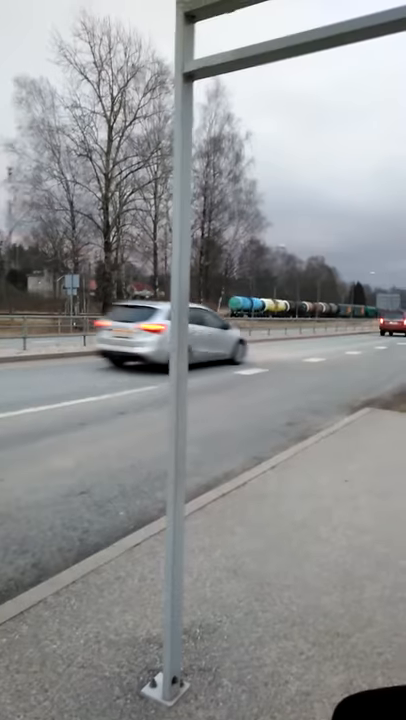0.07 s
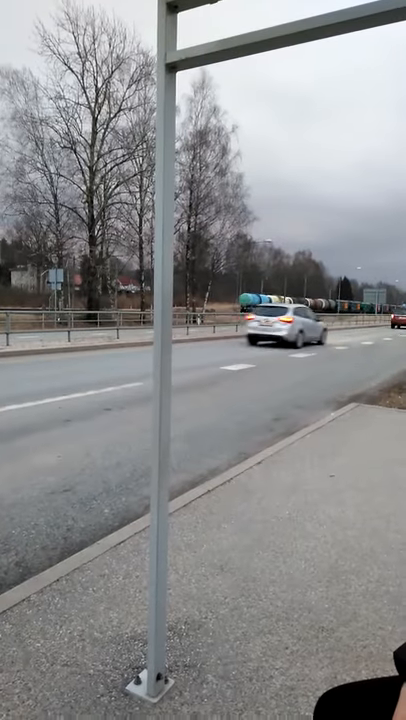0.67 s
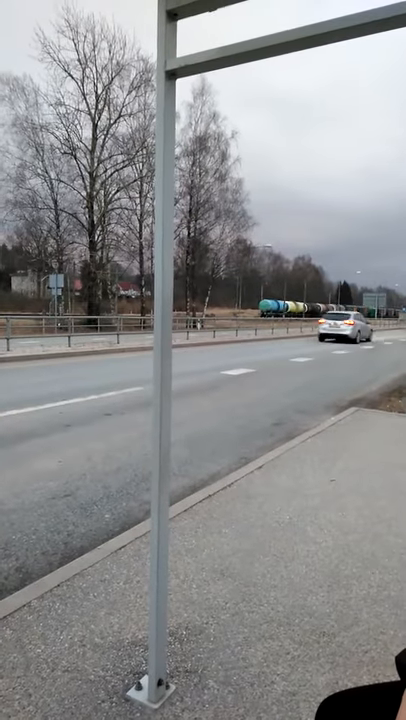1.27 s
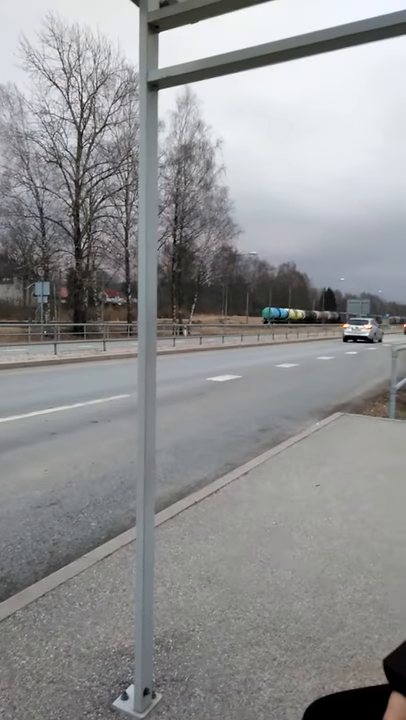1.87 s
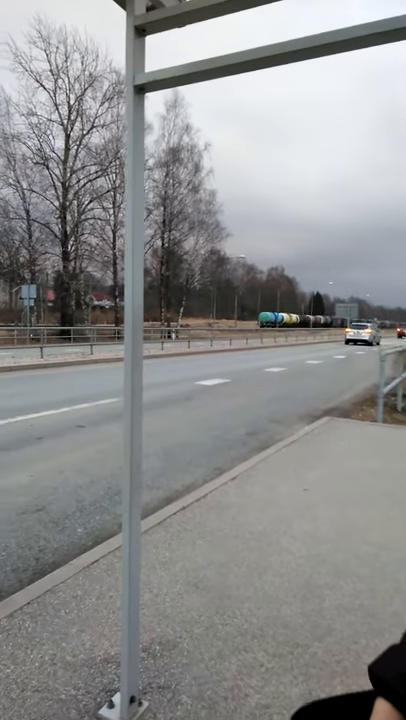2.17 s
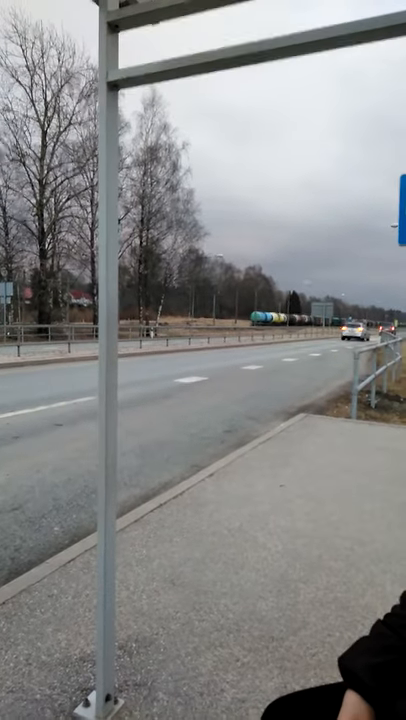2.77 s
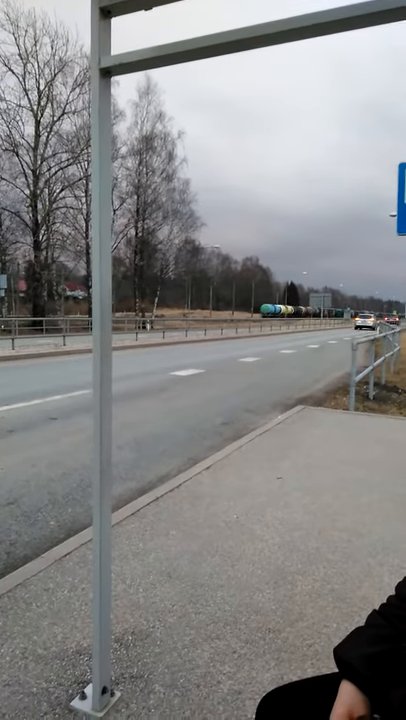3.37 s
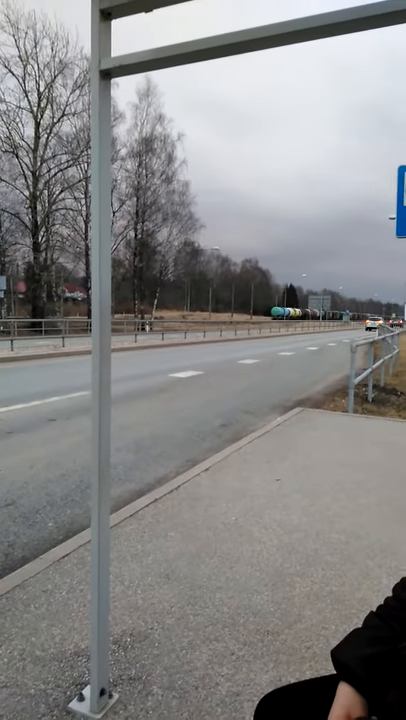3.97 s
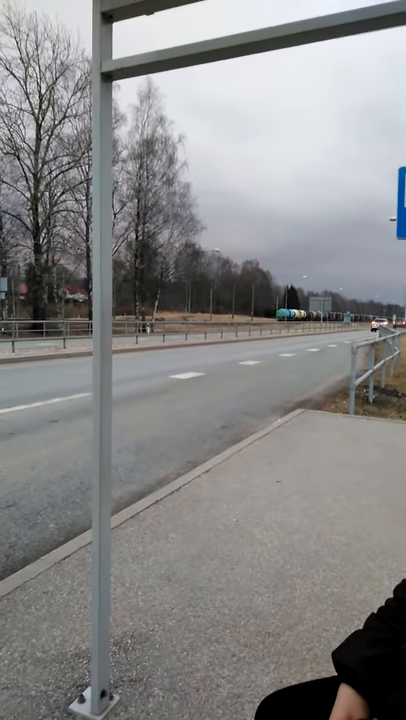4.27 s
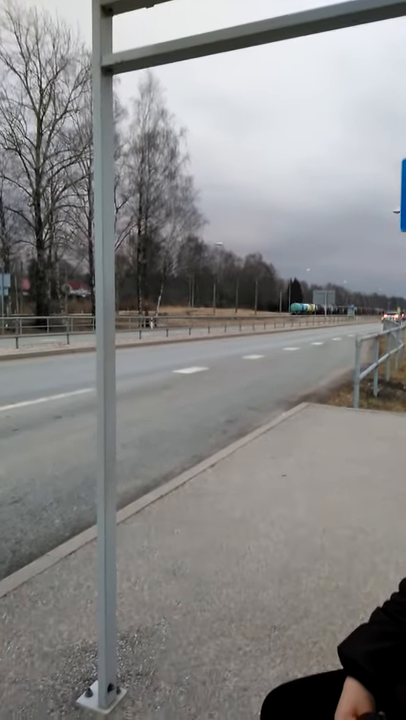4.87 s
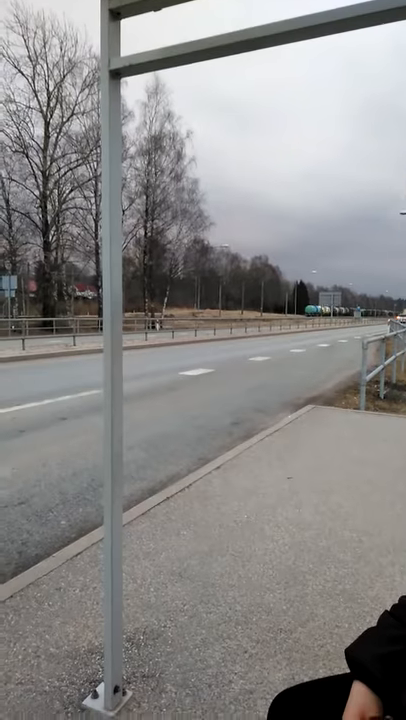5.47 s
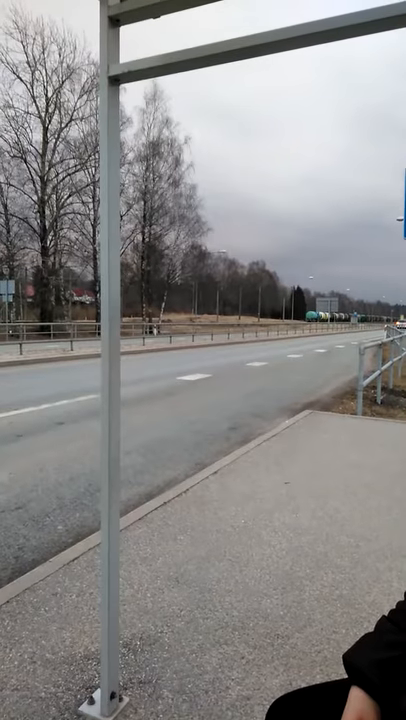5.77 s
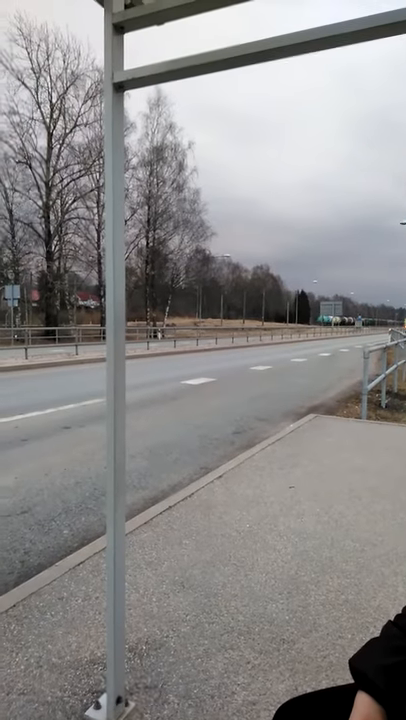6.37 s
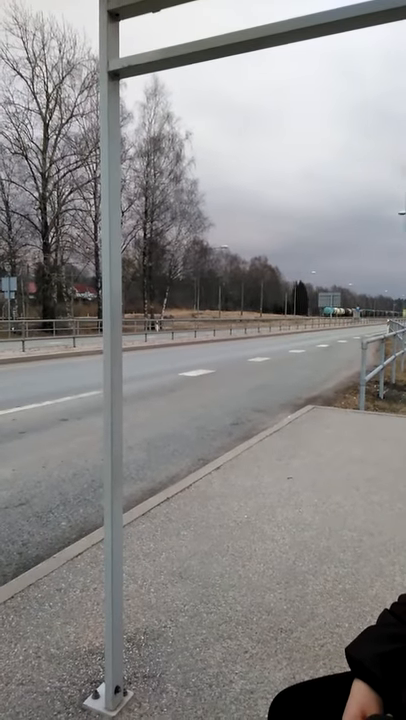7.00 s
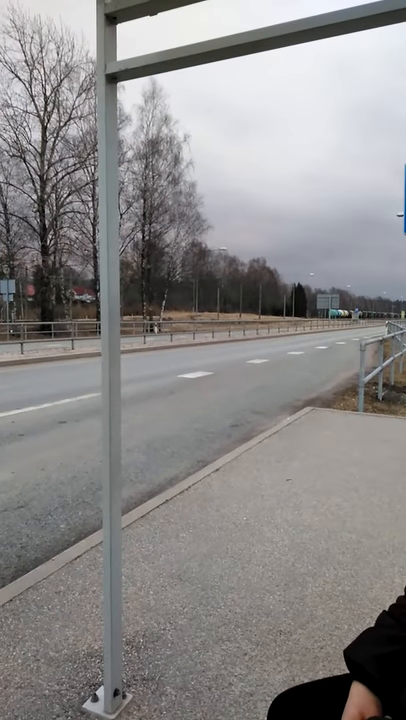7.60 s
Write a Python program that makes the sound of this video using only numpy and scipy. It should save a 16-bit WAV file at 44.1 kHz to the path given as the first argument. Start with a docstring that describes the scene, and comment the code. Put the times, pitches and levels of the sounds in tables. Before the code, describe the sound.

A distant freight train rolls along with a low rumble and a quick, even clacking, dotted with dull knocks, short steel rings and thin wheel squeals. At the start a car is pulling away down the road, its tyre noise dying down over the first few seconds. The train carries on, gradually softer, while small gusts of wind bump against the microphone in the open air.

```python
"""Tyre roar fades and a rumbling freight train clacks about six times a second, far across a field.
The roar is a car driving away from a roadside bus stop. The clack is a worn wheel hitting the rail
once a turn, smeared by distance; wagons knock and boom, wheels squeal and the rails sing.
Light wind buffets a hand-held phone and a sleeve brushes it once.
The phone's two microphone openings (its ports) colour everything."""
import sys
import numpy as np
from scipy import signal
from scipy.fft import rfft, irfft, next_fast_len
from scipy.io import wavfile
from scipy.ndimage import uniform_filter1d, map_coordinates

SR = 44100
rng = np.random.default_rng(int(sys.argv[2]) if len(sys.argv) > 2 else 0)


def output_pcm(signal):
    """Save a mono or channel-first signal as 16-bit PCM at the path in sys.argv[1].

    Samples are clipped to [-1, 1] before scaling.
    """
    pcm = np.clip(np.atleast_2d(signal).T, -1, 1) * 32767
    wavfile.write(sys.argv[1], SR, np.round(pcm).astype(np.int16))


N = 341334
TIME = np.arange(N) / SR
FREQ = np.maximum(np.arange(N // 2 + 1) * SR / N, 1)

# loudness of the wagons' rumble (time [s], level [dB])
RUMBLE_LEVELS = [(0, -32), (.6, -33), (.9, -34.5), (1.5, -35), (3, -36.5), (4, -37.5), (5, -40), (6, -39),
                 (7.7, -38.5)]
# tone of a thudding bogie, the wheeled frame under a wagon (frequency [Hz], relative level [dB])
THUD_SPECTRUM = [(130, -19), (250, 2.5), (500, -1.5), (900, 2), (1300, -11.5), (2500, -57)]
# tone of struck steel (frequency [Hz], relative level [dB])
STEEL_SPECTRUM = [(600, -35), (1100, -2.5), (1600, 1), (2300, 2), (3200, 1.5), (4300, -6.5), (5500, -30),
                  (11000, -55)]
# tone of a hissing wheel rim (frequency [Hz], relative level [dB])
HISS_SPECTRUM = [(3000, -21), (4900, 1.5), (6300, 3.5), (7600, -3), (8300, -16), (11000, -37), (15000, -55)]


def car(top_hz=10050, top_db=-3.5, dulling_db_per_s=17):
    """Tyres roar on asphalt; the roar fades as the car leaves, and its highest hiss dies away quickly."""
    # tone of the tyres (frequency [Hz], relative level [dB])
    tyre_spectrum = [(100, -0.5), (300, -2), (780, -3), (1050, 3), (1350, -6.5), (1650, -3), (2000, -10.5),
                     (3300, -18), (4500, -26), (6500, -23), (8500, -24.5), (11000, -26), (13000, -46),
                     (15000, -66)]
    # loudness of the car (time [s], level [dB])
    car_levels = [(0, -38.5), (.5, -41), (1, -42.5), (1.5, -46.5), (2.3, -48), (3.5, -57), (5, -54),
                  (7.7, -62)]
    roar = turbulence(outdoor_noise(tyre_spectrum), depth_db=1.43, rate=16)
    top = irfft(rfft(roar) / (1 + (top_hz / FREQ) ** 10), N)
    top_gain = undb(top_db - dulling_db_per_s * TIME)
    return (roar + top * (top_gain - 1)) * undb(over_time(car_levels))


def train(treble_hz=3500):
    """Wheels roar on the rails and grow duller with distance; the wagons rumble unevenly underneath."""
    # tone of the rolling wheels (frequency [Hz], relative level [dB])
    roll_spectrum = [(150, 5), (400, -2.5), (850, 2.5), (1300, -5), (2500, -2.5), (3300, -7.5), (4400, -13),
                     (6500, -15), (7700, -22), (8400, -35), (11000, -43), (15000, -81)]
    # loudness of the rolling (time [s], level [dB])
    roll_levels = [(0, -46.5), (2.4, -47), (3.3, -45), (4.3, -47.5), (5.3, -48.2), (6, -49), (7.7, -50.5)]
    # treble, sinking with distance (time [s], gain [dB])
    treble_gains = [(0, 7.5), (3.5, 2), (5.3, 2), (6, -2), (7.7, -2)]
    # tone of the rumble (frequency [Hz], relative level [dB])
    rumble_spectrum = [(20, -42), (35, -33), (60, -0.5), (90, 0), (130, -2.5), (180, -6.5), (240, -15),
                       (310, -36.5), (600, -61)]
    roll = turbulence(outdoor_noise(roll_spectrum), depth_db=1.28, rate=14)
    treble = irfft(rfft(roll) / (1 + (treble_hz / FREQ) ** 4), N)
    roll = roll + treble * (undb(over_time(treble_gains)) - 1)
    rumble = outdoor_noise(rumble_spectrum) * undb(over_time(RUMBLE_LEVELS) + 1.34 * wobble(25))
    return roll * undb(over_time(roll_levels)) + rumble


def clacks(first_s=.079, turn_s=.1685, jitter_s=.004, thud_lead_s=.011, scatter_db=1.8, hiss_db=-8):
    """A worn wheel hits the rail once a turn: the bogie thuds, the steel rings and hisses."""
    # strength of the clacks (time [s], thud level [dB], ring level [dB])
    clack_levels = [(0, -52, -52), (1, -49, -52.5), (1.85, -41.5, -47.5), (2.9, -48.5, -51),
                    (3.55, -54, -64), (4.2, -50, -52.5), (5.2, -53, -51.5), (6.4, -52.5, -52.5),
                    (7.7, -59, -61)]
    beats = np.arange(first_s, TIME[-1], turn_s)
    late, heavy, bright, sharp = rng.standard_normal((len(beats), 4)).T  # no two clacks are alike
    hits = beats + jitter_s * late
    times, *columns = np.transpose(clack_levels)
    thud_db, ring_db = (np.interp(beats, times, column) for column in columns)
    thud_swell = swells(hits - thud_lead_s, thud_db + scatter_db * heavy, rise_s=.011, fall_s=.013)
    ring_swell = swells(hits, ring_db + scatter_db * bright, rise_s=.017, fall_s=.027)
    hiss_swell = swells(hits, ring_db + hiss_db + scatter_db * sharp, rise_s=.013, fall_s=.017)
    thud = turbulence(outdoor_noise(THUD_SPECTRUM), depth_db=3.5, rate=24) * thud_swell
    ring = turbulence(outdoor_noise(STEEL_SPECTRUM), depth_db=1, rate=22) * ring_swell
    return thud + ring + outdoor_noise(HISS_SPECTRUM) * hiss_swell


def knocks(thud_db=-1.5, ring_db=-3):
    """Now and then a bogie knocks harder: a dull thud with a hollow ring."""
    # hard knocks (time [s], level [dB], ring pitch [Hz])
    hits = [(0.255, -39, 560), (1.76, -45, 676), (1.925, -45.5, 480), (2.265, -42.5, 440),
            (2.59, -43.5, 661), (3.155, -41, 450), (4.725, -47.5, 391), (6.14, -49, 880)]
    times, levels_db, _ = np.transpose(hits)
    thud = turbulence(outdoor_noise(THUD_SPECTRUM), depth_db=2, rate=24)
    thud *= swells(times, levels_db + thud_db, rise_s=.011, fall_s=.014)
    hollow = sum(rough_note(hz, blur_rate=250) * swells([s], [db + ring_db], rise_s=.008, fall_s=.017)
                 for s, db, hz in hits)
    return thud + hollow


def booms():
    """The hollow wagons give short, low booms."""
    # wagon booms (time [s], level [dB], pitch [Hz])
    hits = [(0.254, -25.5, 198.7), (0.629, -27, 187), (1.127, -30.5, 210), (1.385, -28, 200.4),
            (2.069, -30.5, 191), (3.777, -40, 287), (4.099, -37.5, 269), (4.584, -32, 184.3),
            (5.234, -40, 293), (5.8, -36.5, 190)]
    return bursts(hits, width_s=.0087, wander=.151)


def clanks():
    """Steel on the train gives a few louder clanks."""
    # clanks (time [s], level [dB])
    hits = [(1.764, -49), (2.955, -48), (3.15, -49), (5.63, -53), (5.805, -51)]
    steel = turbulence(outdoor_noise(STEEL_SPECTRUM), depth_db=3.5, rate=24)
    return steel * swells(*np.transpose(hits), rise_s=.017, fall_s=.019)


def rings():
    """Loose steel parts, struck or rubbed, each ring briefly on one note."""
    # ringing parts (time [s], level [dB], pitch [Hz])
    hits = [(0.428, -47, 1610), (0.69, -50, 3190), (0.755, -54, 3230), (1.085, -55, 6090),
            (2.805, -50.5, 2130), (2.85, -57, 6230), (3.3, -55, 6210), (3.87, -52, 3170), (3.95, -53, 3190),
            (4.31, -68, 5000), (4.55, -60, 6250), (5.23, -57, 6290), (5.3, -54, 3140)]
    return sum(rough_note(hz, blur_rate=330) * swells([s], [db], rise_s=.018, fall_s=.021)
               for s, db, hz in hits)


def squeals():
    """A wheel's lip scrapes the rail and wakes the wheel's high notes, a little off pitch each time."""
    # notes of the wheel (pitch [Hz], width [Hz], boost [dB])
    wheel_notes = [(4960, 60, 12), (5640, 70, 6), (6160, 100, 11), (6480, 80, 8), (7470, 130, 12)]
    # short squeals (time [s], level [dB])
    scrapes = [(1.085, -48.5), (1.43, -56), (1.94, -55), (2.29, -57), (2.465, -53), (2.85, -51),
               (3.295, -50), (4.12, -54), (5.15, -56), (7.338, -50)]
    squeal = drift(outdoor_noise(HISS_SPECTRUM, wheel_notes), share=.005, rate=8)
    squeal = turbulence(squeal, depth_db=2.5, rate=12)
    return squeal * swells(*np.transpose(scrapes), rise_s=.013, fall_s=.023)


def rail_song(railway, pitch_hz=1630, width_hz=190, waver_db=2.04, fade_db_per_s=.57):
    """The rails sing: one narrow band of the train's sound comes and goes, and slowly fades."""
    band = narrow_band(railway, pitch_hz, width_hz)
    gain = undb(waver_db * (wobble(22.04) + 1.4) - fade_db_per_s * TIME)
    return railway + band * (gain - 1)


def rail_chirps(railway, width_hz=57, patchy_db=4.5):
    """The rolling wakes the rails' high notes, each in short patches of its own."""
    # notes of the rails (pitch [Hz], gain on the train's sound [dB])
    rail_notes = [(3135, 3), (3910, -0.5), (4206, -2.5), (4975, 3.5), (6220, 4)]
    chirps = 0
    for hz, db in rail_notes:
        patches = undb(db + patchy_db * np.minimum(wobble(24), 1.5))
        chirps = chirps + narrow_band(railway, hz, width_hz) * patches
    return drift(chirps, share=.004, rate=15)


def ticks():
    """Crisp little ticks sound above the rolling noise."""
    # tone of a tick (frequency [Hz], relative level [dB])
    tick_spectrum = [(5500, -40), (8000, 0), (12000, -40)]
    # ticks (time [s], level [dB])
    hits = [(1.43, -61), (2.28, -62)]
    return outdoor_noise(tick_spectrum) * swells(*np.transpose(hits), rise_s=.008, fall_s=.016)


def wind(top_hz=270, low_hz=36):
    """Each eddy, a small swirl of wind, shakes the air at both ports."""
    # strong buffets (time [s], level [dB], pitch [Hz])
    buffets = [(0.42, -19, 85.4), (0.496, -20.5, 103.7), (0.53, -20.5, 84.9), (0.564, -19.5, 94.3),
               (0.614, -19, 95.8), (0.743, -17.5, 110.4), (1.105, -24.5, 154.6), (1.389, -23.5, 134.2),
               (1.686, -25.5, 84.7), (2.224, -23.5, 85.4), (2.772, -23, 138), (2.842, -25.5, 89.6),
               (2.91, -26, 85.4), (2.959, -17.5, 79.6), (3.038, -20, 80.5), (3.117, -24, 124.8),
               (3.619, -24.5, 83.6), (4.114, -22, 68.7), (4.166, -20, 79.5), (4.718, -23.5, 100.2),
               (5.105, -22.5, 109), (5.135, -23, 64.9), (5.315, -30, 66.6), (5.47, -24.5, 113.1),
               (6.471, -23, 120.7)]
    shaking = bursts([*buffets, *eddies()], width_s=.0093, wander=.2085)
    # small eddies carry little energy, so the buffets stay dull; the ports pass no deep bass
    return irfft(rfft(shaking) / (1 + (FREQ / top_hz) ** 10) / (1 + (low_hz / FREQ) ** 10), N)


def eddies(per_s=2.7, above_rumble_db=4.5, spread_db=2, pitch_hz=110.14, spread_octaves=.451):
    """Weak eddies come at random and ease with the rumble: rows of (time [s], level [dB], pitch [Hz])."""
    slots = np.arange(0, TIME[-1] - 1 / per_s, 1 / per_s)
    late, weak, high = rng.uniform(-1.1, 1, (len(slots), 3)).T
    times = slots + (1 + late) / 2 / per_s
    levels_db = np.interp(times, *np.transpose(RUMBLE_LEVELS)) + above_rumble_db - spread_db * weak
    return np.transpose([times, levels_db, pitch_hz * 2 ** (spread_octaves * high)])


def sleeve():
    """Cloth touches the phone: a tiny tick, then a short brush."""
    # tone of the cloth (frequency [Hz], relative level [dB])
    cloth_spectrum = [(3000, -34), (7000, -2), (10000, 0), (15000, -3)]
    tick = swells([5.041], [-46.5], rise_s=.0007, fall_s=.0016)
    brush = swells([5.064], [-60], rise_s=.012, fall_s=.026)
    return outdoor_noise(cloth_spectrum) * (tick + brush)


def outdoor_noise(spectrum, resonances=()):
    """Noise of strength 1 at the two ports: alike in the bass, less so in the treble."""
    # how alike left and right are (frequency [Hz], likeness [0 to 1])
    likeness = [(60, 1), (170, 1), (250, 0.92), (470, 0.87), (930, 0.71), (1840, 0.62), (7200, 0)]
    alike = np.clip(over_hz(likeness), -1, 1)
    mid, side = rfft(rng.standard_normal((2, N))) * np.sqrt([1 + alike, 1 - alike])
    tone = undb(over_hz(spectrum) + peaks(resonances))
    noise = irfft(np.array([mid + side, mid - side]) * tone, N)
    return noise / noise.std()


def turbulence(sound, depth_db, rate):
    """Moving air makes each half octave of a far sound flicker on its own; the result has strength 1."""
    size = next_fast_len(N)
    spectrum, out = rfft(sound, size), 0
    band_number = np.clip(2 * np.log2(np.linspace(1, SR / 2, size // 2 + 1) / 250), 0, 9)
    for k in range(10):
        band = irfft(spectrum * np.maximum(1 - abs(band_number - k), 0), size)[:, :N]
        out = out + band * undb(depth_db * wobble(rate))
    return out / out.std()


def swells(times, levels_db, rise_s, fall_s):
    """Loudness outline of a row of blows: each swells to its peak and dies away more slowly."""
    power = np.zeros(N)
    for s, db in zip(times, levels_db):
        near = slice(max(int((s - .25) * SR), 0), int((s + .25) * SR))
        t = TIME[near] - s
        power[near] += (undb(db) / np.cosh(t / np.where(t < 0, rise_s, fall_s))) ** 2
    return np.sqrt(power)


def bursts(rows, width_s, wander):
    """A few uneven low vibrations for each (time [s], level [dB], pitch [Hz]) row."""
    out = np.zeros(N)
    bend = np.exp(wander * np.clip(wobble(220), -2, 2))
    for s, db, hz in rows:
        near = slice(max(int((s - .1) * SR), 0), int((s + .1) * SR))
        turns = rng.random() + np.cumsum(hz * bend[near]) / SR
        outline = np.exp(-.5 * ((TIME[near] - s) / width_s) ** 2)
        out[near] += undb(db) * outline * np.sin(2 * np.pi * turns)
    return out


def rough_note(hz, blur_rate, blur_radians=1.4):
    """A ringing note of strength 1, made rough by its many paths across the field."""
    return np.sqrt(2) * np.sin(2 * np.pi * hz * TIME + blur_radians * wobble(blur_rate))


def drift(sound, share, rate):
    """Let the pitch of a sound slide up and down by a small share."""
    place = np.arange(N) + np.cumsum(share * wobble(rate))
    return np.array([map_coordinates(port, [place], order=3, mode="mirror") for port in sound])


def wobble(rate):
    """A smooth random curve of typical size 1 that heads for a new value `rate` times a second."""
    hold = int(SR / rate)
    steps = np.repeat(rng.standard_normal(N // hold + 1), hold)
    return 1.486 * uniform_filter1d(uniform_filter1d(steps, hold), hold)[:N]


def narrow_band(sound, hz, width_hz):
    """Keep only the part of a sound near one pitch."""
    return irfft(rfft(sound) / (1 + (2 * (FREQ - hz) / width_hz) ** 4), N)


def peaks(rows):
    """Gain in dB at each frequency from (pitch [Hz], width [Hz], gain [dB]) resonances."""
    return sum(db / (1 + (2 * (FREQ - hz) / width) ** 2) for hz, width, db in rows)


def over_time(rows):
    """Join (time [s], value) rows by straight lines."""
    return np.interp(TIME, *np.transpose(rows))


def over_hz(rows):
    """Join (frequency [Hz], value) rows, giving every octave equal room."""
    hz, value = np.transpose(rows)
    return np.interp(np.log(FREQ), np.log(hz), value)


def undb(db):
    """Turn decibels into a factor to multiply by."""
    return 10 ** (np.asarray(db) / 20)


def scene():
    """Road, railway and wind together."""
    railway = rail_song(train() + clacks())
    return (car() + railway + rail_chirps(railway) + knocks() + booms() + clanks()
            + rings() + squeals() + ticks() + sleeve() + wind())


def record(dry, top_hz=15400):
    """The two ports colour the sound, the left one hears it slightly later, and the top is cut."""
    # resonances of the ports and the bus shelter (pitch [Hz], width [Hz], gain [dB])
    resonances = [(390, 12, 4), (528, 16, 3), (1580, 164, 6.5), (1840, 280, -4), (2006, 87, 6)]
    # which side is louder (frequency [Hz], left minus right [dB])
    balance = [(100, -0.3), (300, 1.5), (750, -1.5), (1100, 4), (1900, -1), (3050, 0.5), (3600, -4.5),
               (4900, -0.5), (6200, -3.5), (7500, -0.5), (9000, 2)]
    # how far the left wave runs ahead; negative is behind (frequency [Hz], phase [radians])
    left_lead = [(30, -.12), (150, -.17), (300, -.3), (900, -.3), (1300, -1.2), (2000, -1.5), (3000, -3.3),
                 (4000, -9), (7400, -36)]
    left = undb(over_hz(balance) / 2) * np.exp(.5j * over_hz(left_lead))
    ports = undb(peaks(resonances)) * np.array([left, 1 / left])
    top_cut = signal.ellip(8, .2, 70, top_hz, fs=SR, output="sos")
    return signal.sosfilt(top_cut, irfft(rfft(dry) * ports, N))


dry = scene()
out = record(dry)
output_pcm(out)
```